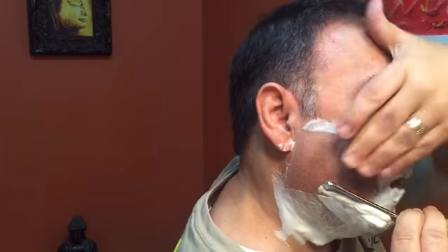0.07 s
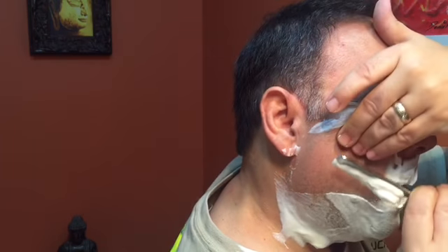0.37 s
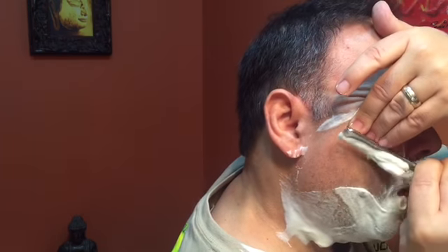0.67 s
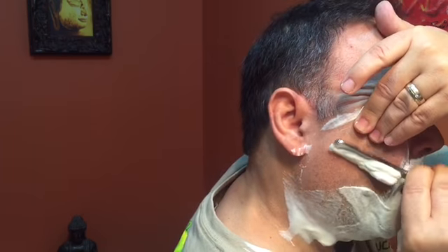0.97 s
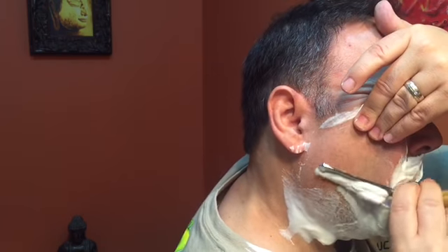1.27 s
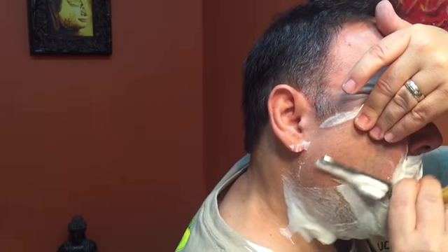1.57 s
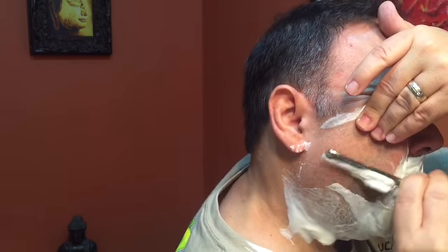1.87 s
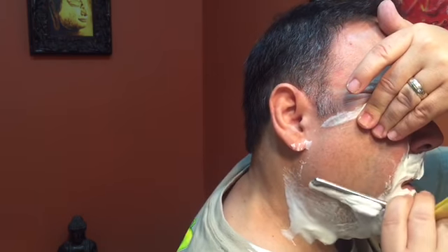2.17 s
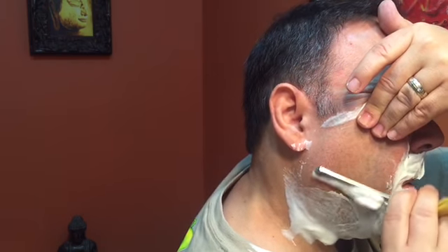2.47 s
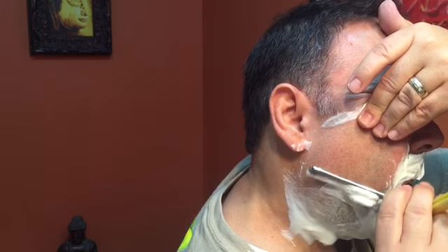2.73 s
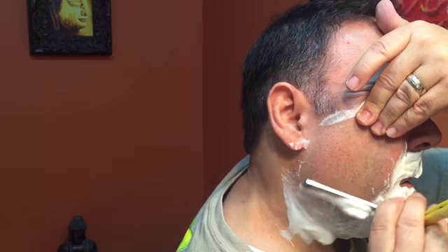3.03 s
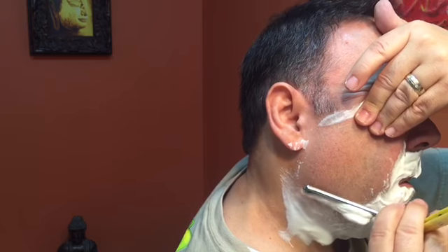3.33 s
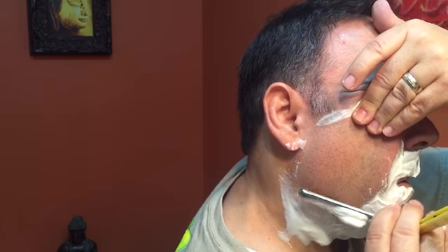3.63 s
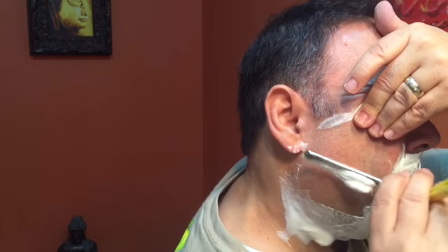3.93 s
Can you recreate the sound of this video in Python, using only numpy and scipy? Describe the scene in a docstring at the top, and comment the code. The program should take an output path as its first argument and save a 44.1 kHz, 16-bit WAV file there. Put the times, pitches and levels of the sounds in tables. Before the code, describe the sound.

A straight razor rasps through a lathered cheek in seven short, close strokes.

```python
"""Faint room noise and mains hum, then the close rasp of a straight razor: seven short strokes on a
lathered cheek in a small room. Each is a hail of tiny impulses from parting whiskers. They excite narrow
resonances of the blade and its near surroundings; the timbre darkens as more of the edge meets the skin.
Between strokes the blade slides lightly back or lifts off the lather with a small wet smack."""
import sys
import numpy as np
from scipy import signal
from scipy.fft import rfft, irfft
from scipy.io import wavfile

SR = 44100
rng = np.random.default_rng(int(sys.argv[2]) if len(sys.argv) > 2 else 0)


def bounce(signal):
    """Save signal as a 16-bit WAV file at the path given by the first command-line argument."""
    frames = np.transpose(np.atleast_2d(signal))
    limited = np.clip(frames, -1, 1)
    pcm = np.round(limited * 32767).astype(np.int16)
    wavfile.write(sys.argv[1], SR, pcm)


N = 176400
T = np.arange(N) / SR
RESPONSE_SAMPLES = 2049
WHISKERS_PER_S, SKIN_GRAINS_PER_S = 2000, 5500


def razor():
    """Source and filter: every contact rings the same resonances; the kind of contact sets the timbre."""
    # spectra of a cut with the tip, a cut with the whole edge and a slide on skin: f/Hz, level/dB
    tip_spectrum = [(400, -27), (1000, -24), (1350, -46.5), (1580, -14), (1800, -1.5), (2150, 1.5),
                    (2550, -3.5), (2900, -4), (3400, -13), (4000, 0.5), (4500, 2), (5000, -4), (5800, -8),
                    (6900, -6), (7800, -11.5), (9400, -10.5), (10300, -20), (11200, -17), (15000, -24)]
    edge_spectrum = [(400, -44), (1100, -20), (1350, -14), (1580, -9), (1750, -0.5), (2200, -3),
                     (2650, 1.5), (2870, -3), (3500, 0.5), (4200, -1), (4700, -5), (5600, -8), (6600, -3),
                     (7800, -10.5), (9200, -12), (10300, -23.5), (11200, -20), (15000, -22.5)]
    skin_spectrum = [(500, -47), (1450, -22), (1900, -7.5), (2800, -7), (3500, -1), (4500, 4), (5500, -7.5),
                     (6500, -4), (8000, -14.5), (10300, -19), (15000, -23)]
    tip, edge, skin = map(contact_response, (tip_spectrum, edge_spectrum, skin_spectrum))
    # cutting strokes: start t/s, rise t/s, ease-off t/s, release t/s, level/dB, drift to ease-off/dB,
    # mid-stroke swell/dB, treble/dB, first and last share of edge in contact, relative sizzle/dB
    strokes = [(.924, .018, 1.255, .105, -47.5, 3.5, 1.5, 0, .02, .2, -20),
               (1.555, .009, 1.74, .075, -40.5, -4, .2, 0, .1, .5, -14),
               (2.041, .01, 2.237, .06, -38.5, -8.5, .2, -.5, .03, .75, -13),
               (2.476, .026, 2.625, .085, -42, -2, 1.5, -1, .55, .8, -14),
               (2.896, .03, 3.045, .065, -46, -5, 2.5, 0, .7, .95, -9),
               (3.25, .022, 3.375, .05, -45, -8, 2.5, 0, .75, .95, -13),
               (3.57, .01, 3.668, .035, -52.5, 0, 4, 1.5, .9, .95, -4)]
    cuts = np.zeros(N)
    for start, *settings in strokes:
        add(cuts, start, stroke(tip, edge, start, *settings))
    return cuts + touches(tip) + slides(skin) + smacks(skin) + snaps(tip + edge)


def stroke(tip, edge, start, rise, ease, release, db, drift_db, swell_db, treble_db,
           first, last, sizzle_db):
    """Forced vibration: parting whiskers drive the rasp as the edge settles and the hand eases off."""
    t = T[:SR * 3 // 4]
    hold = ease - start
    progress = np.minimum(t / hold, 1)
    held_db = db + drift_db * progress + swell_db * np.sin(np.pi * progress)
    release_db = -30 * (np.maximum(t - hold, 0) / release) ** 1.56
    pressure = np.minimum(t / rise, 1) * amp(held_db + release_db)
    contact = first + (last - first) * progress
    drive = pressure * grains(len(t), WHISKERS_PER_S)
    cut = through(drive * (1 - contact), tip) + through(drive * contact, edge)
    sizzle = through(pressure * grains(len(t), WHISKERS_PER_S), mode(hz=6360, width_hz=330))
    arch = np.sin(np.pi * np.minimum(t / (hold + release), 1))
    cut = brighten(cut, treble_db + 3 * (arch - 1))  # brightest in mid-stroke
    return cut + amp(sizzle_db - 4.5) * np.diff(sizzle, prepend=0)


def contact_response(spectrum):
    """Minimum-phase impulse response of unit energy: a broad spectrum plus narrow ringing resonances."""
    # resonances (and one notch) of the blade and its near surroundings: f/Hz, bandwidth/Hz, gain/dB
    resonances = [(1452, 26, 15), (1719, 35, 5.5), (1919, 51, 11), (2004, 11.7, 10.5), (2130, 50, 3),
                  (2540, 45, 0), (2637, 52, 8), (2710, 48, 1), (2985, 13, 3.5), (3017, 51, 7),
                  (3160, 43, 2), (3487, 60, 9), (4500, 18, -12), (4360, 75, 0.5)]
    hz = abs(np.fft.fftfreq(2 * RESPONSE_SAMPLES, 1 / SR))
    peaks_db = sum(db / (1 + (2 * (hz - f) / width) ** 2) for f, width, db in resonances)
    log_gain = np.log(amp(level_at(spectrum, hz) + peaks_db))
    transfer = np.exp(np.conj(signal.hilbert(log_gain)))
    response = np.fft.ifft(transfer).real[:RESPONSE_SAMPLES]
    return response / np.linalg.norm(response)


def grains(size, per_s, snap_s=.00028, rub_db=-8):
    """Shot noise of rms 1: random tiny bursts over a smooth rub, juddering as the edge catches."""
    strengths = amp(3.6 * np.minimum(rng.exponential(1, size), 3))
    impulses = strengths * (rng.random(size) < per_s / SR)
    power = signal.lfilter([1], [1, -np.exp(-1 / (snap_s * SR))], impulses ** 2)
    envelope = np.sqrt(power / (power.mean() + 1e-12) + amp(rub_db) ** 2)
    rasp = envelope * rng.standard_normal(size)
    judder = amp(.26 * wander(size, hz=145.7))
    return unit(rasp * judder)


def snaps(response):
    """Impulse excitation: a coarse whisker snaps singly and the resonances ring out."""
    # coarse whiskers: t/s, peak level/dB
    whiskers = [(.8905, -36), (.933, -38), (1.056, -33), (1.092, -33), (1.0995, -33), (1.562, -31),
                (1.587, -32), (2.076, -26), (2.1005, -32), (2.4925, -32), (2.9045, -36), (3.317, -33),
                (3.374, -39), (3.609, -32), (3.6305, -38)]
    out = np.zeros(N)
    for start, db in whiskers:
        add(out, start, amp(db) * response / abs(response).max())
    return out


def touches(tip, rise_s=.009, fall_s=.013):
    """Contact transients: whiskers crackle briefly as the edge is set down."""
    # landings of the edge: t/s, time until decay/s, level/dB
    landings = [(0.871, 0.024, -54), (1.501, 0.0094, -63), (2.019, 0.0078, -47), (2.896, 0.0046, -44.5),
                (3.269, 0.0062, -49), (3.706, 0.0064, -62.5)]
    t = T[:SR // 8]
    out = np.zeros(N)
    for start, length, db in landings:
        envelope = amp(db) * np.minimum(t / rise_s, 1) * np.exp(-np.maximum(t - length, 0) / fall_s)
        add(out, start, through(envelope * grains(len(t), WHISKERS_PER_S), tip))
    return out


def slides(skin):
    """Sliding friction: the blade skims the skin, giving finer grains under a Gaussian swell."""
    # light passes: centre t/s, standard deviation/s, level/dB, treble/dB
    passes = [(0.88, 0.011, -49.5, -7), (1.387, .014, -56, -1.5), (1.87, .019, -52, 0.5),
              (2.336, 0.015, -60, 2), (2.788, .031, -53, 0), (3.118, .013, -68.5, 1.5)]
    t = T[:SR // 2]
    out = np.zeros(N)
    for centre, sigma, db, treble_db in passes:
        swell = amp(db) * np.exp(-.5 * (t / sigma - np.pi) ** 2)
        friction = brighten(swell * grains(len(t), SKIN_GRAINS_PER_S), treble_db)
        add(out, centre - np.pi * sigma, through(friction, skin))
    return out


def smacks(skin, rise_s=.005, fall_s=.007):
    """Damped resonance: lifting off the lather makes a wet burst that rings one broad mode."""
    # lifts of the blade: peak t/s, level/dB, resonance f/Hz
    lifts = [(3.450, -52, 3720), (3.752, -60.5, 3850)]
    lead_s = 4 * rise_s
    t = T[:SR // 4] - lead_s
    envelope = np.exp(np.minimum(t / rise_s, -t / fall_s))
    out = np.zeros(N)
    for peak, db, hz in lifts:
        burst = amp(db) * envelope * grains(len(t), SKIN_GRAINS_PER_S)
        smack = amp(-1) * burst + amp(-6.5) * through(burst, mode(hz, width_hz=800))
        add(out, peak - lead_s, through(smack, skin))
    return out


def room(x, t60_s=.19, tail_db=-10.5, echo_db=-9.5, echo_span_s=.011, echoes=8):
    """Reverberation: a few early reflections and an exponential tail follow the direct sound."""
    t = T[:SR // 2]
    tail = rng.standard_normal(len(t)) * amp(-60 * t / t60_s) * (t > echo_span_s / 2)
    response = amp(tail_db) * tail / np.linalg.norm(tail)
    for delay in echo_span_s * rng.uniform(.1, 1, size=echoes):
        add(response, delay, amp(echo_db) * rng.choice([-1, 1], size=1) / np.sqrt(echoes))
    return x + through(x, response)


def room_noise(db=-64):
    """Stationary Gaussian noise, strongest in the bass."""
    # spectral density: f/Hz, relative level/dB
    spectrum = [(12, -59), (20, -19), (49, -0.5), (82, -1), (121, -1.5), (169, -9.5), (249, -10.5),
                (286, -16.5), (319, -10.5), (497, -15), (603, -16), (865, -19.5), (966, -17), (4820, -29),
                (15000, -36.5)]
    gain = amp(level_at(spectrum, np.fft.rfftfreq(N, 1 / SR)))
    return amp(db) * unit(irfft(rfft(rng.standard_normal(N)) * gain, N))


def mains_hum(waver_db=2.2):
    """Slow amplitude and phase modulation makes four faint tones waver."""
    # hum tones: f/Hz, rms level/dB
    tones = [(59.5, -82), (119, -73.5), (323, -86.5), (602, -83.5)]
    out = np.zeros(N)
    for hz, db in tones:
        amplitude = np.sqrt(2) * amp(db + waver_db * wander(N, hz=3.9))
        out += amplitude * np.sin(2 * np.pi * hz * T + .5 * wander(N, hz=3.8))
    return out


def bumps():
    """Gaussian tone bursts only a few cycles long are heard as soft low bumps."""
    # bursts: centre t/s, standard deviation/s, f/Hz, rms level at the centre/dB
    bursts = [(1.772, .022, 118, -60), (1.803, .018, 55, -60), (1.905, .025, 45, -67),
              (1.17, .025, 62, -67)]
    out = np.zeros(N)
    for centre, sigma, hz, db in bursts:
        t = T - centre
        out += np.sqrt(2) * amp(db) * np.exp(-.5 * (t / sigma) ** 2) * np.sin(2 * np.pi * hz * t)
    return out


def mode(hz, width_hz):
    """Impulse response of a damped oscillator, of unit energy."""
    t = T[:2 * RESPONSE_SAMPLES]
    ring = np.exp(-np.pi * width_hz * t) * np.sin(2 * np.pi * hz * t)
    return ring / np.linalg.norm(ring)


def brighten(x, db, corner_hz=5260):
    """Zero-phase treble shelf whose gain may vary in time."""
    treble = signal.sosfiltfilt(signal.butter(2, corner_hz, "high", fs=SR, output="sos"), x)
    return x + (amp(db) - 1) * treble


def wander(size, hz):
    """Random modulation of rms near 1, interpolated between hz values a second."""
    position = np.arange(size) * hz / SR
    return np.interp(position, np.arange(2048), rng.standard_normal(2048)) * np.sqrt(1.5)


def level_at(spectrum, hz):
    """Interpolation of levels on a log-frequency axis."""
    f, db = np.transpose(spectrum)
    return np.interp(np.log(hz + 1), np.log(f + 1), db)


def amp(db):
    """Decibels to amplitude ratio."""
    return 10 ** (np.asarray(db) / 20)


def unit(x):
    """Normalisation to rms 1."""
    return x / np.sqrt(np.mean(x ** 2) + 1e-20)


def add(mix, start_s, sound):
    """Superposition of a delayed sound on the mix."""
    part = mix[max(round(start_s * SR), 0):][:len(sound)]
    part += sound[:len(part)]


def through(x, response):
    """Convolution, cut to the input's length."""
    return signal.fftconvolve(x, response)[:len(x)]


def scene():
    """Superposition of the razor in its room and the background, in mono."""
    return (room(razor()) + room_noise() + mains_hum() + bumps())[None]


def record(dry, cutoff_hz=15450):
    """Band limiting: a linear-phase low-pass removes the highest treble."""
    lowpass = signal.firwin(511, cutoff_hz, window=("kaiser", 9), fs=SR)
    return signal.oaconvolve(dry, lowpass[None], "same")


dry = scene()
out = record(dry)
bounce(out)
```